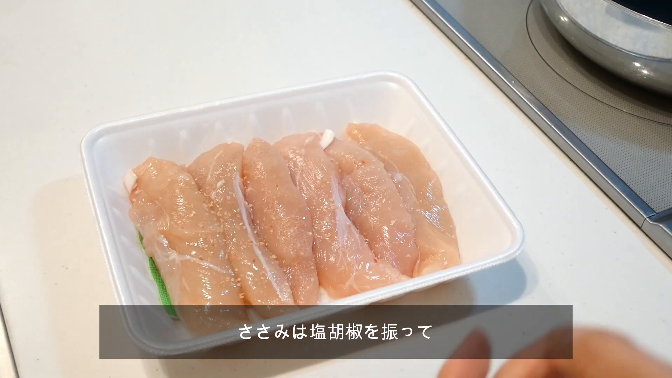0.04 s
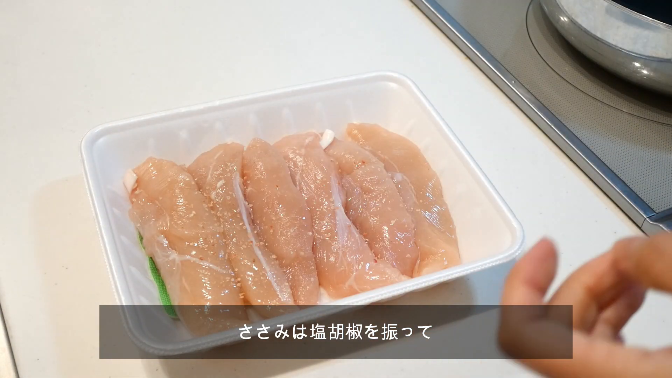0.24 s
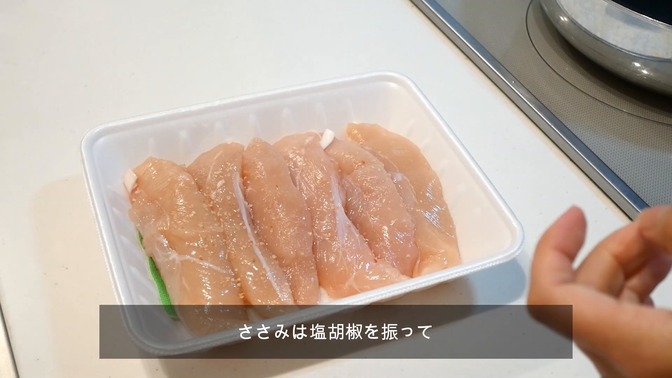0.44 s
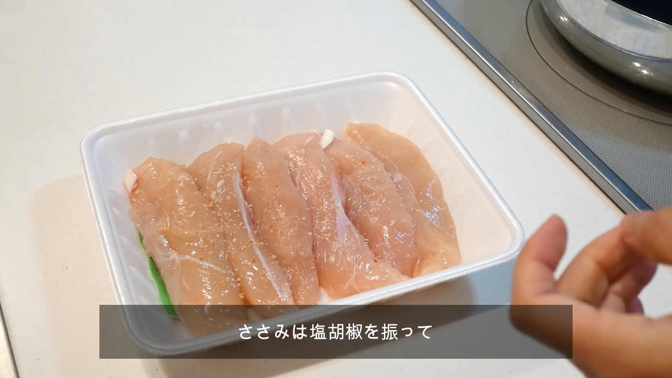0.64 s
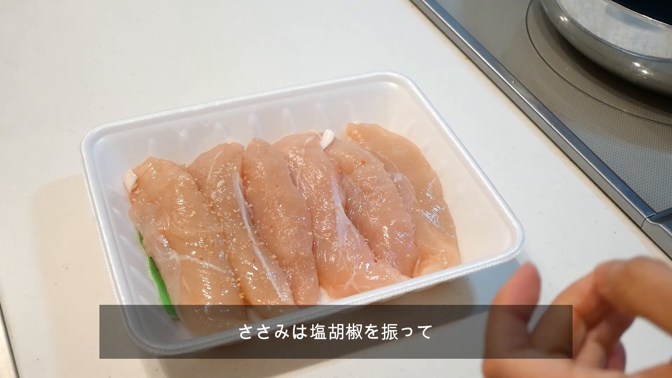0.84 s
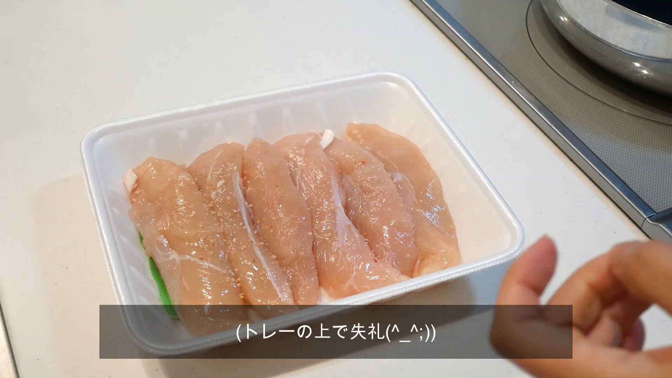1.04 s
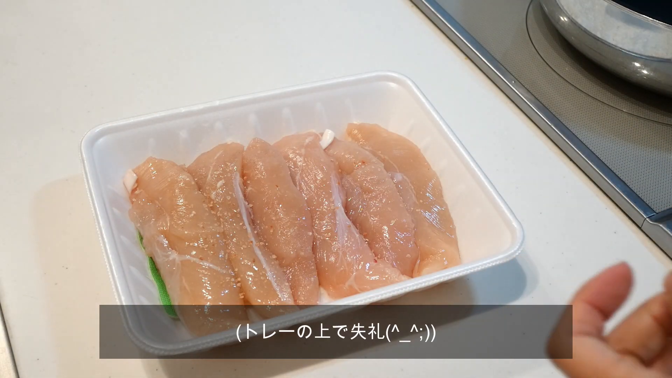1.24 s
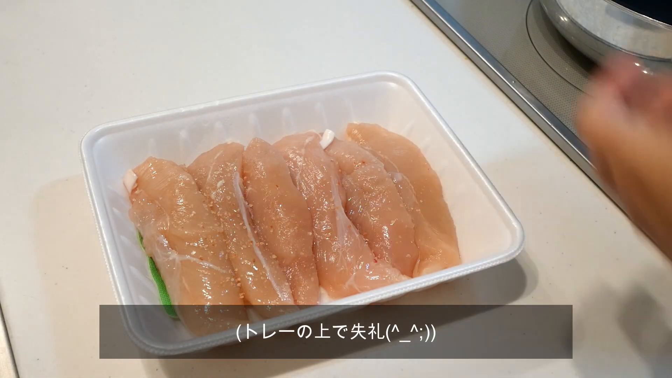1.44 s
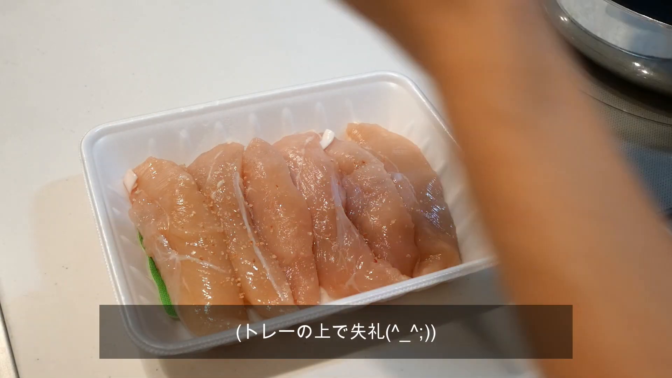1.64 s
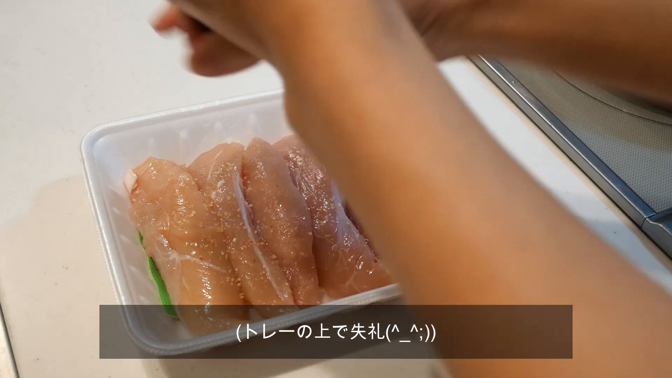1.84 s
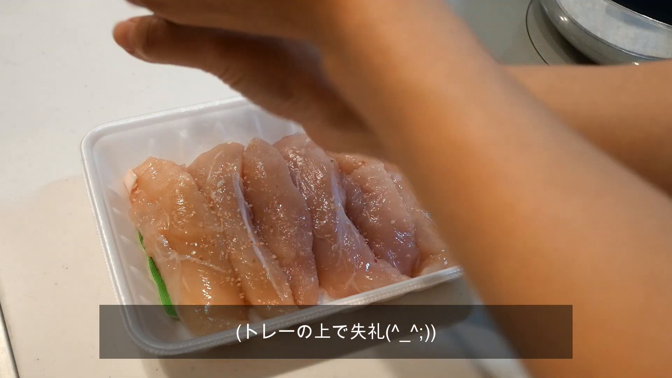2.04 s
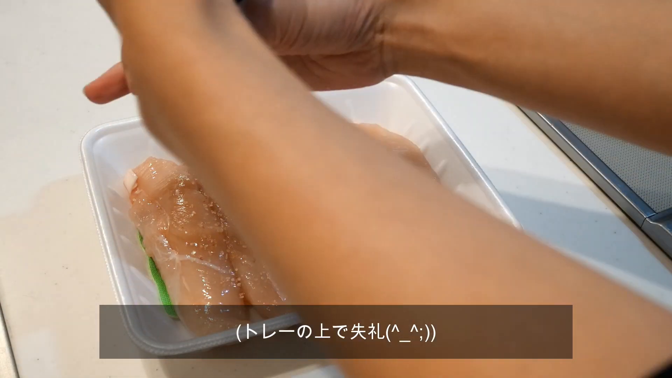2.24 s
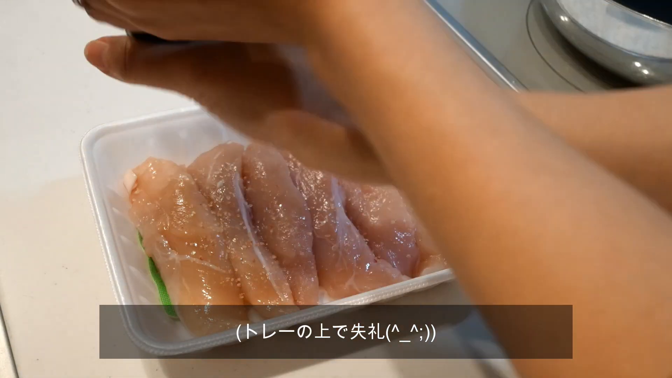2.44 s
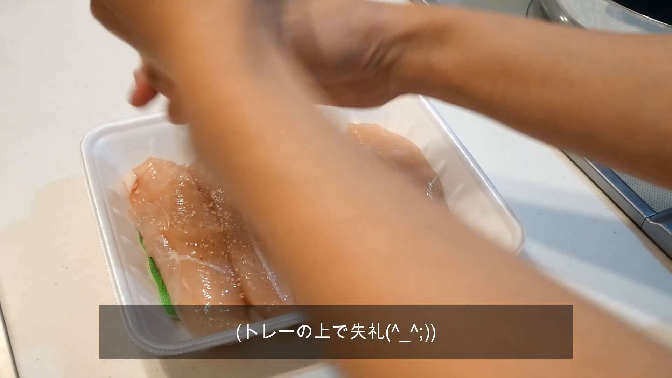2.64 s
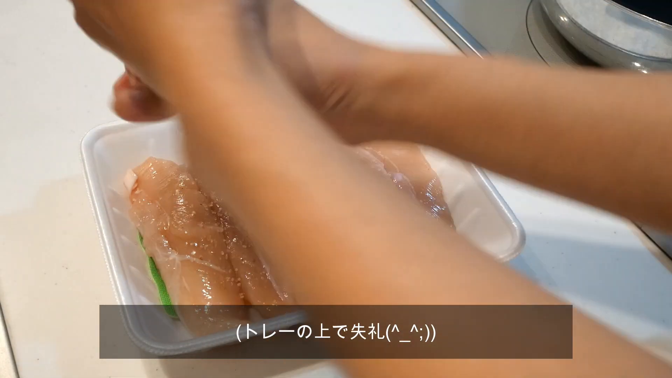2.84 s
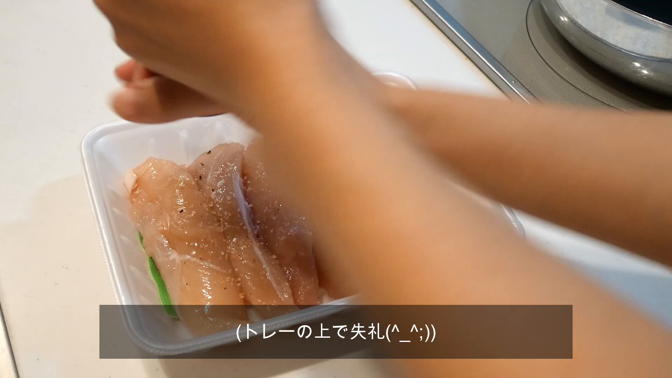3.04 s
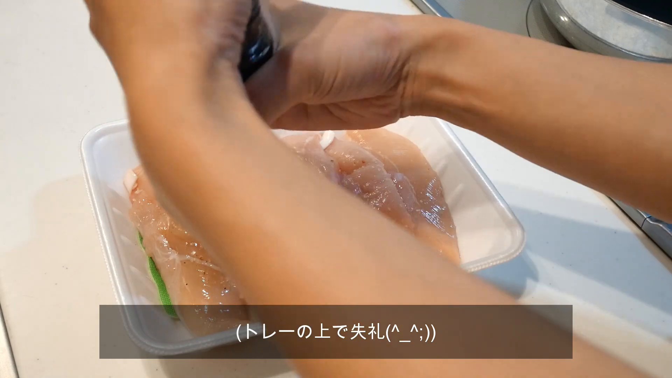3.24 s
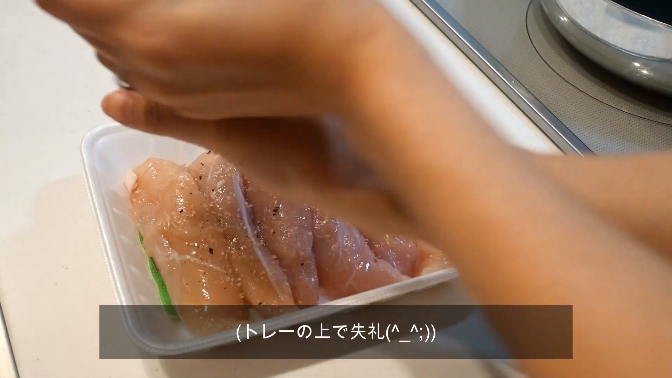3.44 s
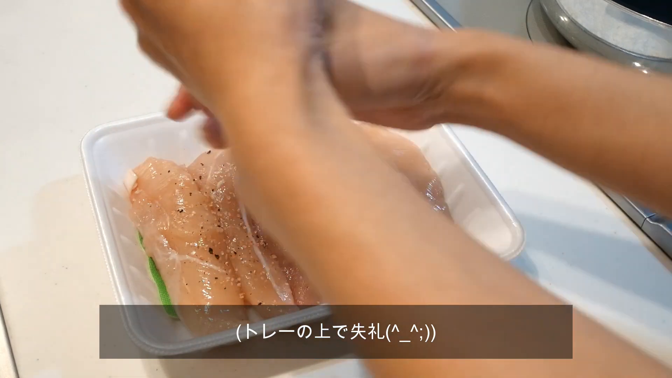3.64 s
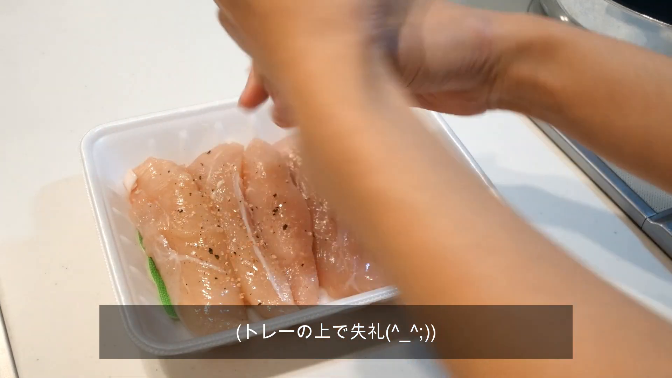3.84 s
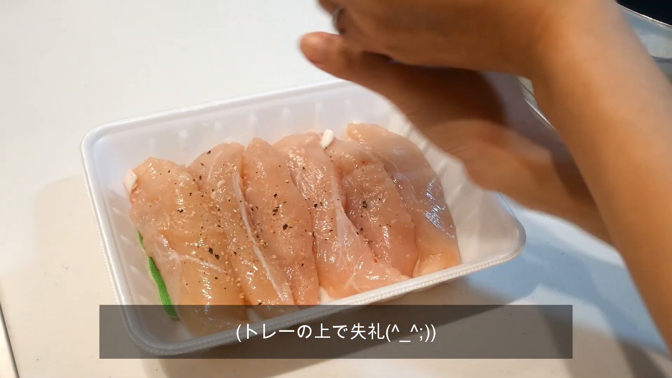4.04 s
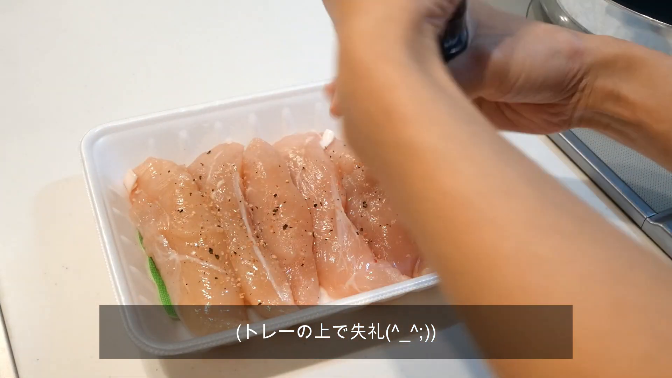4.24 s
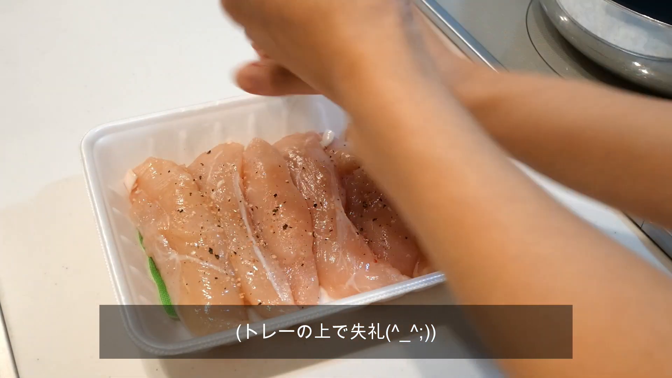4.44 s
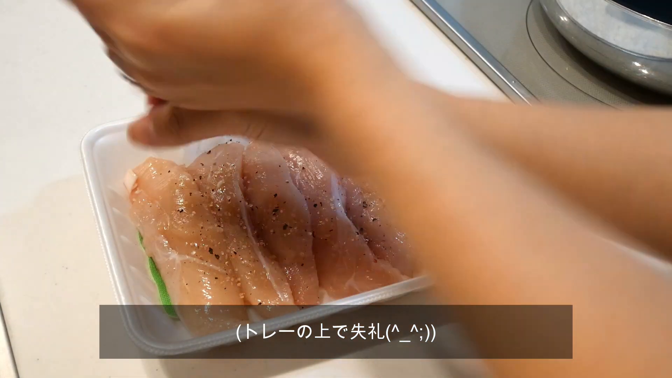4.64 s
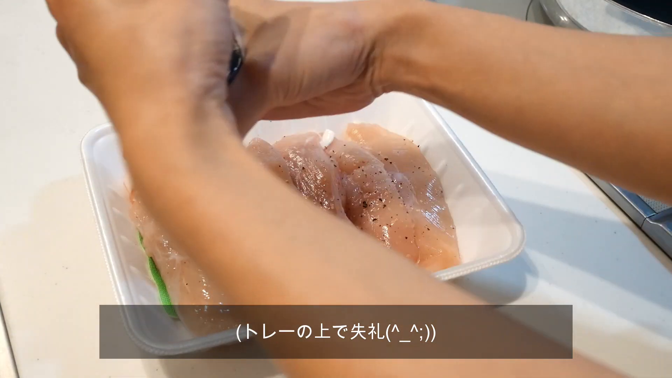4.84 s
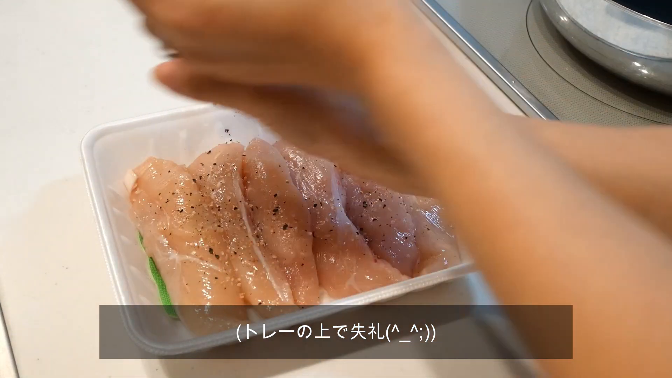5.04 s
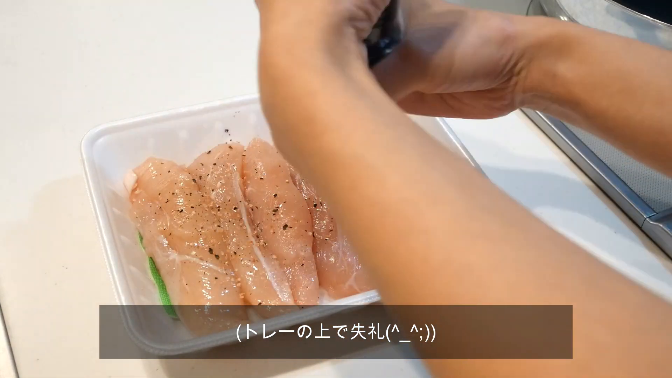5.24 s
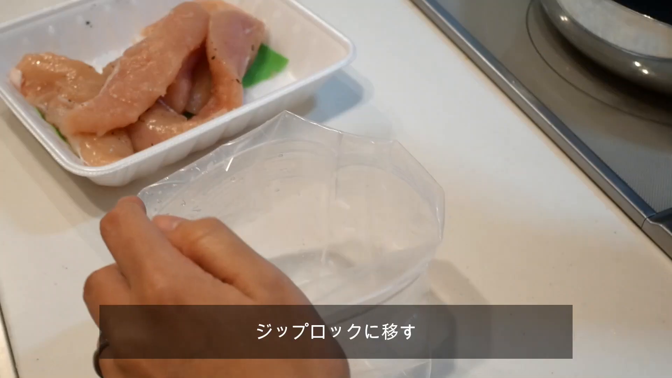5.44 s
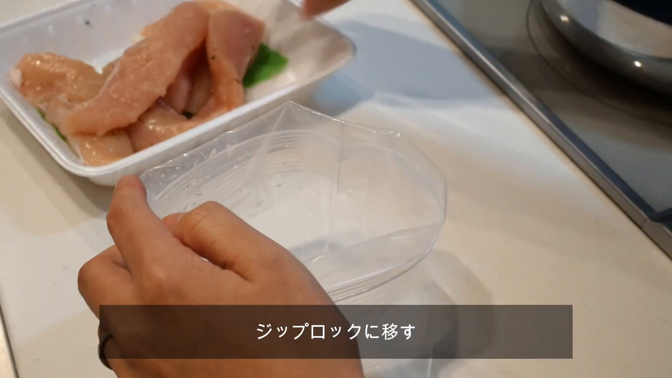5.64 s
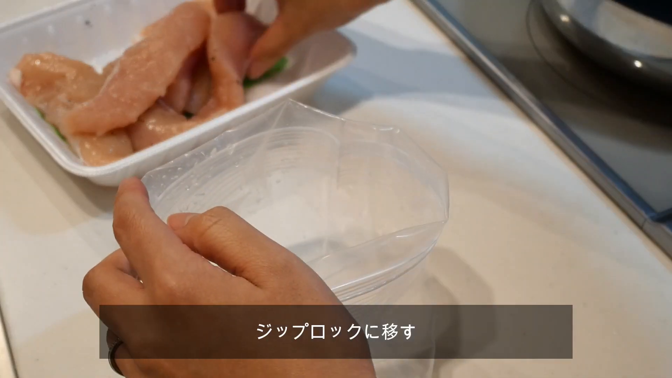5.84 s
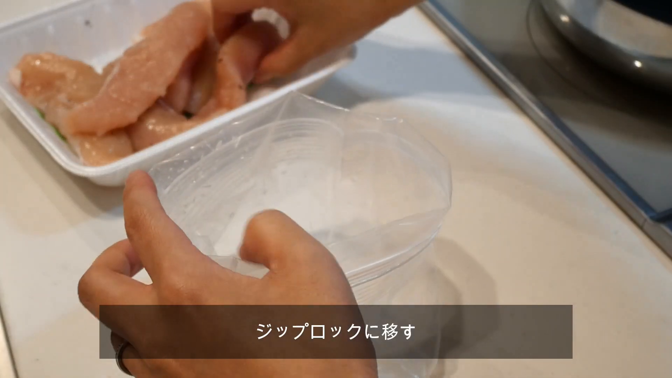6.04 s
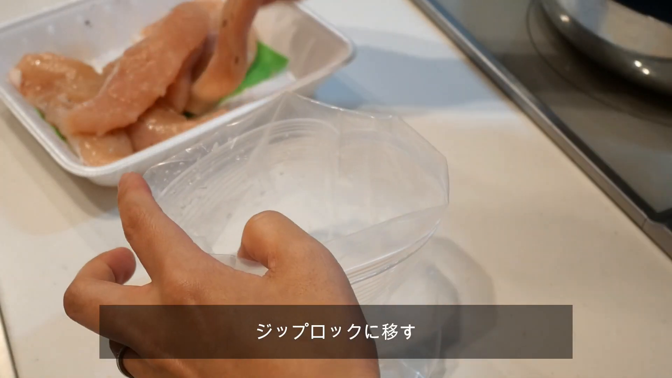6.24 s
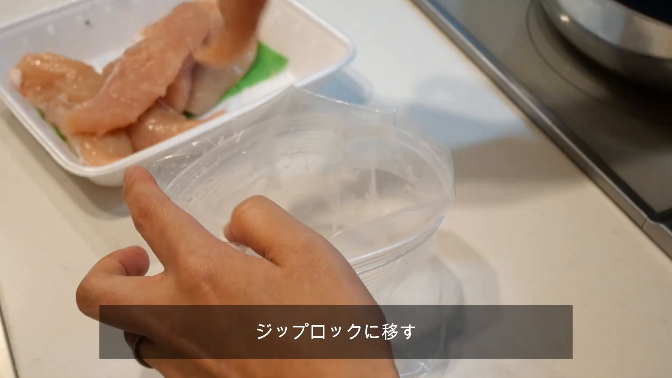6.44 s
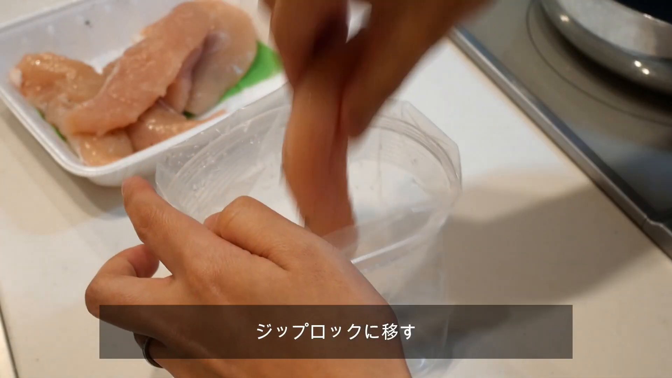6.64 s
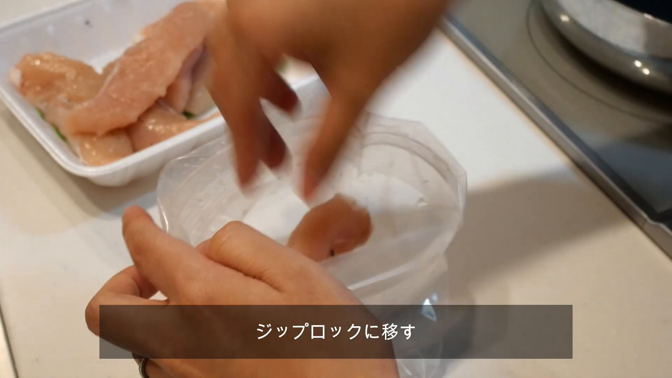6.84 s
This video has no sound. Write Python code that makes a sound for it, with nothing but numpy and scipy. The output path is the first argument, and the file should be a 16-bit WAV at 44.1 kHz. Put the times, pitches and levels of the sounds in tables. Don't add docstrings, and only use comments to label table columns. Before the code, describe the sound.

A jar knocks and slides on a kitchen counter, then peppercorns rattle and crunch in a hand mill before faint plastic bag crackles over fridge hum.

```python
import sys
import numpy as np
from scipy import signal
from scipy.io import wavfile
from scipy.ndimage import uniform_filter1d

SR = 44100
rng = np.random.default_rng(int(sys.argv[2]) if len(sys.argv) > 2 else 0)


def nominal_scale(level):
    x = np.asarray(level, float) / 20
    return 10 ** x


def master_out(mix):
    frames = np.transpose(np.atleast_2d(mix))
    ceiling = np.clip(frames, -1, 1)
    pcm = np.round(ceiling * 32767).astype(np.int16)
    wavfile.write(sys.argv[1], SR, pcm)


N = 304290

# time in seconds, peak in dB, snap in Hz, hollow body and bright spit in
# dB relative to the snap.
CRACKS = [(1.8235, -20, 4300, -10.5, -17), (2.2333, -20, 3990, -12, -19), (2.2474, -22, 2040, 0.5, -5.5),
          (2.6862, -25, 4430, -9.5, -19.5), (2.7005, -25.5, 3050, 7, -6), (2.7095, -24, 3220, -17.5, -12),
          (2.7307, -16.5, 2460, -0.5, -14), (2.748, -20, 3500, -8, -14), (2.7545, -22.5, 2500, -22, -17),
          (3.1383, -20.5, 3560, -19, -14), (3.1452, -17, 3410, -10, -7), (3.1586, -22, 3570, -31, -15),
          (3.1862, -22.5, 3270, -14, -10), (3.1928, -18.5, 4030, -9, -13), (3.2049, -26, 3660, -28, -12),
          (3.6523, -13, 6160, -2, -12.5), (3.6597, -6.5, 3340, -7.5, -6.5), (3.6744, -14, 4650, -13.5, -2),
          (3.7012, -17.5, 3335, -8.5, -7), (3.7077, -16.5, 3200, -13, -11.5),
          (3.7414, -14, 3240, -3.5, -9.5), (3.755, -12.5, 3410, -10, -7), (4.1825, -26, 3862, -22.5, -20),
          (4.21, -16, 4870, -7, -18), (4.2553, -6.5, 4667, -14.5, -10.5), (4.2732, -6, 3490, -10, -9),
          (4.2797, -14.5, 3190, -8.5, 1), (4.3168, -32.5, 3040, -17.5, 11),
          (4.7361, -17.5, 3800, -10.5, -1), (4.7611, -22.5, 6900, 2, -1), (4.768, -19, 4870, -9, -2),
          (4.7772, -27, 7230, -3, -2.5), (4.8033, -26.5, 4600, -26, -6), (4.8105, -23.5, 4500, -11.5, 4),
          (4.8156, -16.5, 3810, -26.5, 0), (5.2075, -27, 5010, -16, -14.5), (5.2249, -24.5, 4890, -15, -12),
          (5.2494, -13, 4250, -5, -5), (5.2758, -18.5, 9170, -13.5, -1), (5.2946, -20.5, 4330, -14, -10)]
SHARDS = [
    (2.739, -23.5, 3000, -3, -16),
    (3.1907, -17.5, 2550, -7.5, -20),
    (3.6836, -24, 2000, 9, -15),
    (5.257, -19.5, 3000, -2, -16),
    (5.2983, -24.5, 2800, -4, -14),
]
# time in seconds, peak in dB, snap in Hz, hollow body in dB relative to the snap.
CHIPS = [(1.9543, -40.5, 4390, -16), (2.115, -45, 5550, -23), (2.19, -44.5, 2160, -10),
         (2.1979, -29.5, 4950, -15), (2.2272, -39, 2220, -3), (2.3153, -37, 6030, -3),
         (2.4215, -49, 3020, 4), (2.4523, -33.5, 3330, -11), (2.5518, -45, 4570, -13),
         (2.644, -35.5, 4960, 1), (2.6574, -30, 4890, -7), (2.674, -31, 3550, -8),
         (2.9413, -45.5, 2070, -10), (2.995, -56, 2150, 5), (3.112, -44, 3850, -9),
         (3.1188, -30.5, 3550, -6), (3.1252, -32.5, 2000, 3), (3.44, -51, 4150, -13),
         (3.4664, -39, 2390, 1), (3.4943, -44, 5000, -17), (3.5327, -39.5, 5100, -16),
         (3.58, -35, 5900, -33), (3.6133, -31.5, 4650, -26), (3.6332, -29, 3300, -9),
         (3.9675, -37, 3550, -13), (3.996, -45.5, 2220, -1), (4.0177, -47, 4290, 1),
         (4.2014, -47.5, 3600, -26), (4.4177, -35, 7650, -11), (4.4555, -41.5, 7200, -15),
         (4.5166, -47.5, 1960, 9), (4.657, -41, 4900, -27), (4.6651, -41.5, 4010, -28),
         (4.6819, -31, 5470, -34), (4.6899, -34, 5700, -27), (4.7238, -30, 3730, -8),
         (4.8689, -29, 4220, -21), (4.947, -52.5, 4610, -28), (4.965, -52, 4460, -13),
         (4.9883, -38, 4230, -23), (5.1343, -44.5, 5620, -23), (5.1535, -55.5, 4110, -23),
         (5.1858, -41, 4130, -11), (5.219, -33, 2300, -0.5), (5.2448, -25, 3170, -4),
         (5.3471, -30.5, 6960, -16), (5.3872, -40, 4660, -15), (5.4203, -36, 5080, -21)]
# time in seconds, peak in dB, snap in Hz, bright spit
# in dB relative to the snap.
TAPS = [(1.5303, -45, 4500, -5), (1.585, -41, 5130, -20), (1.6345, -38, 5160, -15), (1.649, -51, 11000, -3),
        (1.6587, -37.5, 5470, -10), (1.7032, -40.5, 6870, -11), (1.7247, -31, 7300, -8),
        (1.776, -28, 5270, -4)]


def fractures():
    large = list(CRACKS) + list(SHARDS)
    chips = [(*row, -29) for row in CHIPS]
    taps = [(s, db, hz, -16, spit_db) for s, db, hz, spit_db in TAPS]
    return large, chips + taps


# start, rise and hold in seconds, grit in dB, hollow body in dB relative to grit.
CRUSH = [(1.76, 0.054, 0.05, -32, -7), (2.13, 0.13, 0.0115, -39, -0.5), (2.61, 0.098, 0.049, -34, -3.5),
         (3.108, 0.056, 0.041, -32.5, -2), (3.63, 0.031, 0.032, -32, 0.5), (3.72, 0.021, .012, -28, 1),
         (4.15, 0.063, .006, -34.5, -17.5), (4.235, 0.045, 0.043, -31, -1.5),
         (4.66, 0.072, 0.1, -35.5, -13), (5.17, 0.093, 0.038, -29.5, -2.5)]
RETURN = [(1.9, 0.017, 0.12, -50.5, 0), (2.125, 0.032, 0.048, -56.5, 8), (2.37, 0.054, 0.067, -46, -2),
          (2.87, 0.048, 0.086, -45, -3.5), (3.385, 0.045, 0.065, -43, -3.5), (3.5, 0.015, 0.11, -49, -22.5),
          (3.9, 0.038, 0.11, -45.5, -6.5), (4.38, 0.013, 0.2, -51, -3.5), (4.95, 0.071, 0.054, -44.5, -3.5)]
# resonance in Hz, width in Hz, level in dB.
GRIT = [(2320, 6300, -5.5), (2650, 560, 0.5), (3270, 750, 0), (3950, 680, 0.5), (4560, 1200, -1),
        (5600, 1000, -2), (6760, 1300, -9.5)]
# resonance in Hz, width in Hz, level in dB.
DUST = [(7300, 1600, 11), (9800, 1300, 3), (11700, 2500, 1.5), (13900, 2100, 1)]
# resonance in Hz, width in Hz, level in dB.
BODY = [
    (1658, 78, 3),
    (1530, 260, -3),
    (1800, 750, -3.5),
    (1050, 710, -13),
]
# resonance in Hz, width in Hz, level in dB.
GRIP = [(342, 89, 13), (520, 140, 7), (110, 120, -11.5)]
# time in seconds, left-right difference in dB.
MILL_PLACE = [(1.3, -8), (2.2, 2.6), (3.7, 3), (4.2, -2.5), (4.5, -3), (4.7, 3.5), (5.3, -4)]


def mill():
    crushing = twist(CRUSH, build_db=29, release_db_per_s=250.5, dust_db=-5.5, dust_steepness=0.86)
    rubbing = twist(RETURN, build_db=12.5, release_db_per_s=218, dust_db=-11.5, dust_steepness=2.5)
    grit, body, dust = crushing + rubbing
    large, small = fractures()
    crumble = debris(large + small, t60=0.097)

    ground = spread(lambda: grains(2000, spread_db=2.0, clump_db=4.0), 0.35)
    centre = ground.sum(axis=0)
    burrs = rms_one(band(resonate(ground, GRIT, dealt=True), 890, 8000))
    cavity = rms_one(wander(resonate(centre, BODY)))
    hands = rms_one(resonate(centre, GRIP))
    powder = rms_one(band(resonate(ground, DUST, dealt=True), 3700, 22000))

    sound = (grit + nominal_scale(-16.0) * crumble) * burrs
    sound += (nominal_scale(0.5) * body + nominal_scale(-28.5) * crumble) * cavity
    sound += (nominal_scale(-28) * crumble + nominal_scale(-17.5) * body) * hands
    sound += lean(0.8) * (dust + nominal_scale(-17) * crumble) * powder

    cracks = snaps(small, MILL_PLACE, ring_ms=0.57, width=0.2, crack_db=-18, hollow=BODY, hollow_db=-1.0,
                   jolt_db=-34.5, gain_db=2.0, top_hz=15540)
    cracks += snaps(large, MILL_PLACE, ring_ms=1.3, width=0.078, crack_db=-4.5, hollow=BODY, hollow_db=0.3,
                    jolt_db=-33.5, gain_db=-1.0, top_hz=15700)
    return nominal_scale(-2.5) * sound * lean(0.5) + cracks


def twist(rows, build_db, release_db_per_s, dust_db, dust_steepness):
    effort = [row[:4] for row in rows]
    hollow = [(*row[:3], row[3] + row[4]) for row in rows]
    grit = swell(effort, build_db, release_db_per_s)
    body = swell(hollow, build_db, release_db_per_s, steep=2)
    dust = nominal_scale(dust_db) * swell(effort, build_db, release_db_per_s, dust_steepness)
    return np.array([grit, body, dust])


# time in seconds, pitch ratio.
BODY_PITCH = [(1.8, 1.03), (2.4, 1.03), (2.52, .96), (2.7, 1.0), (3.1, .99), (3.65, 1.0), (3.85, .96),
              (4.0, .98), (4.4, 1.01), (4.75, .98), (5.4, 1.01)]
BODY_WANDER = 0.008


def wander(x):
    ratio = np.interp(np.arange(N) / SR, *np.transpose(BODY_PITCH)) + BODY_WANDER * drift(5.0)
    return np.interp(np.cumsum(ratio) % (N - 1), np.arange(N), x) * nominal_scale(1.5 * drift(31))


def snaps(rows, place, ring_ms, width, crack_db, hollow, hollow_db, jolt_db, gain_db, top_hz):
    out, t = np.zeros((2, N)), np.arange(1500) / SR
    envelope = (1 - np.exp(-t / 0.00011)) * np.exp(-t * 1000 / ring_ms)
    for s, db, hz, body_db, spit_db in rows:
        burst, other = rng.standard_normal((2, len(t))) * envelope
        ears = pair(burst, other, 0.44)
        ring = crest(resonate(ears, [(hz, width * hz, 0)]))
        crack = crest(band(band(ears, 2000, 5400), 1200, 8000))
        spit = crest(band(band(pair(burst, other, 0.1), 6600, top_hz), 3600, 13000))
        snap = crest(ring + nominal_scale(crack_db) * crack) + nominal_scale(spit_db - 0.5) * spit

        detune = np.interp(s, *np.transpose(BODY_PITCH)) + BODY_WANDER * rng.standard_normal()
        body = resonate(burst, [(centre * detune, wide, level) for centre, wide, level in hollow])
        snap += nominal_scale(body_db + hollow_db) * crest(body)
        snap += nominal_scale(jolt_db) * crest(resonate(np.abs(burst), GRIP))
        add(out, s - 0.0003, nominal_scale(db + gain_db) * snap, np.interp(s, *np.transpose(place)))
    return out


def debris(rows, t60):
    power = np.zeros(N)
    np.add.at(power, [round(row[0] * SR) for row in rows], nominal_scale([2 * row[1] for row in rows]))
    return np.sqrt(signal.lfilter([1], [1, -nominal_scale(-120 / (t60 * SR))], power))


# start, rise and hold in seconds, patter in dB, bright
# part in dB relative to the patter.
TUMBLE = [
    (1.233, .06, .03, -54.5, -17),
    (1.317, .008, 0.028, -42.5, -6),
    (1.342, 0.027, 0.033, -39, -6),
    (1.43, 0.059, 0.0078, -40.5, -6),
    (1.546, 0.1, .09, -48.5, -8),
    (1.71, 0.015, 0.0049, -36, -0.5),
    (1.76, 0.028, 0.095, -28.5, -4.5),
]
# resonance in Hz, width in Hz, level in dB.
SHELL = [(3160, 4700, -5.5), (5000, 1400, 0), (7460, 810, -3.5)]


def tumble():
    patter = swell([row[:4] for row in TUMBLE], build_db=12.5, release_db_per_s=220)
    bright = swell([(*row[:3], row[3] + row[4]) for row in TUMBLE], build_db=42, release_db_per_s=380)
    hits = spread(lambda: grains(6000, spread_db=-2.5, clump_db=3.5), 0.18)
    walls = rms_one(band(resonate(hits, SHELL, dealt=True), 2400, 12000))
    clicks = rms_one(band(hits, 8400, 13900))
    return nominal_scale(-3.5) * (patter * walls + bright * clicks) * lean(-0.5)


# time in seconds, peak in dB, tick in dB relative to the peak, pitch favoured by the
# spot struck in Hz.
KNOCKS = [(0.197, -13, -13, 623), (0.2035, -18, -29, 290), (0.2249, -31, -30, 255),
          (0.247, -25.5, -26, 280), (0.2863, -22, -10.5, 520), (0.2906, -22, -19, 306),
          (0.333, -33, -30, 288), (0.358, -34.5, -21, 270), (0.51, -43.5, -8, 280),
          (1.002, -32.5, -26, 580), (1.046, -38.5, -20, 850), (1.063, -44, -20, 300),
          (1.088, -33, -11.5, 320), (1.0978, -34, -30, 323), (1.113, -42, -12, 320), (1.138, -41, -13, 347)]
# pitch in Hz, level in dB, decay time t60 in seconds.
COUNTER = [(110, -8, 0.215), (141.5, 1, 0.72), (264.6, -6.5, 0.6), (310, 11.5, 0.057), (358, 1.5, 0.12),
           (482, -1, 0.18), (545.5, 6.5, 0.077), (710, -0.5, 0.095), (860, 0, 0.075), (974, -1, 0.13),
           (1256, -15, .05), (1290, -6, .05)]


def jar_knocks():
    out, t = np.zeros((2, N)), np.arange(9000) / SR
    for s, db, tick_db, spot_hz in KNOCKS:
        blow = np.zeros(len(t))
        for hz, level_db, t60 in COUNTER:
            mode_db = level_db - 17.5 * abs(np.log2(hz / spot_hz)) + rng.normal(0, 2.6)
            blow += nominal_scale(mode_db - 60 * t / t60) * np.sin(2 * np.pi * hz * t)
        blow += band(rng.standard_normal(len(t)), 110, 830) * nominal_scale(2.5 - 60 * t / 0.26)
        blow += band(rng.standard_normal(len(t)), 1017, 4700) * nominal_scale(tick_db + 11.0 - 60 * t / 0.1)
        blow += band(rng.standard_normal(len(t)), 5000, 15000) * nominal_scale(tick_db - 20.5 - 60 * t / 0.51)
        rise_s = 0.00072 * nominal_scale(-0.4 * (db + 13))
        add(out, s, nominal_scale(db - 10.5) * blow * (1 - np.exp(-t / rise_s)), pan_db=-1.2)
    return out


# start, rise and hold in seconds, level in dB.
SLIDE = [
    (0.33, 0.025, 0.064, -51.5),
    (.45, 0.045, 0.15, -51),
    (.74, 0.015, 0.023, -66),
]
# resonance in Hz, width in Hz, level in dB.
SCRAPE = [(1250, 52, 8.5), (2106, 270, 1.5), (2850, 88, 2), (3380, 230, 7), (4650, 190, -8),
          (6000, 280, -18)]
# start, rise and hold in seconds, level in dB.
SQUEAK = [(.35, 0.0098, 0.084, -49), (.45, .02, 0.018, -64), (.505, 0.06, 0.033, -50),
          (.62, 0.034, 0.0099, -60), (.72, 0.018, 0.05, -62.5)]
# start, rise and hold in seconds, level in dB.
BUMPS = [(.29, 0.0062, .005, -44), (.49, 0.05, .01, -52.5), (.6, 0.038, 0.083, -58)]
# start, rise and hold in seconds, level in dB.
SCUFF = [(0.99, 0.015, 0.012, -58.5), (1.07, .03, 0.031, -85)]
# start, rise and hold in seconds, level in dB.
THUDS = [(.995, .025, 0.027, -52), (1.085, 0.032, 0.072, -54)]


def jar_slide():
    rubbing = grains(4000, spread_db=2.0, clump_db=2.0)
    squeak_hz = 654 + 6.0 * drift(25)
    singing = np.sin(2 * np.pi * np.cumsum(squeak_hz) / SR) * nominal_scale(2.5 * drift(40))
    out = nominal_scale(2.5) * swell(SQUEAK, build_db=6, release_db_per_s=883) * singing

    scraping = rms_one(resonate(rubbing, SCRAPE) + nominal_scale(-6.5) * band(rubbing, 1400, 7200))
    out += nominal_scale(-7.0) * swell(SLIDE, build_db=2.5, release_db_per_s=190) * scraping
    shaking = nominal_scale(-23) * rms_one(band(rubbing, 30, 75)) + nominal_scale(0.5) * rms_one(band(rubbing, 68, 620))
    out += swell(BUMPS, build_db=1, release_db_per_s=139) * shaking
    out += nominal_scale(-9.5) * swell(THUDS, build_db=14, release_db_per_s=200) * rms_one(band(rubbing, 55, 130))
    out += nominal_scale(3.0) * swell(SCUFF, build_db=39, release_db_per_s=116) * rms_one(band(rubbing, 530, 4700))
    return out


# time in seconds, peak in dB, snap in Hz, low part and bright spit in dB relative
BAG = [(5.93, -66, 9020, -20, -2), (6.0756, -60, 4000, -7, -15), (6.1375, -49.5, 5300, -12, -20),
       (6.165, -65, 3550, -15, -15), (6.2247, -53.5, 6000, -9, -5), (6.2302, -63, 3010, -9.5, -15),
       (6.3202, -56, 3460, -13, -20), (6.7664, -64, 5030, -14.5, -15), (6.8217, -25.5, 3860, -13.5, -25),
       (6.8292, -33.5, 7900, -13, -23), (6.836, -33, 3500, -21, -8), (6.856, -39, 3200, -10, -17),
       (6.8603, -21.5, 2960, -17, -26), (6.862, -26, 5630, -19, -26), (6.8678, -44, 5000, -4, -12),
       (6.8985, -42, 4000, -8, -15)]
# start, rise and hold in seconds, level in dB.
RUSTLE = [
    (5.63, 0.014, 0.033, -69),
    (6.1, 0.042, 0.0039, -78),
    (6.3, .016, .004, -72),
    (6.72, 0.015, 0.1, -67),
]


def bag():
    film = rms_one(band(spread(lambda: grains(6000, spread_db=9.0, clump_db=1.5), 0.4), 1149, 7500))
    level = nominal_scale(-6.0) * swell(RUSTLE, build_db=15, release_db_per_s=72.5) + nominal_scale(-21) * debris(BAG, t60=0.2)
    flips = snaps(BAG, [(6, -0.4)], ring_ms=1.5, width=0.13, crack_db=4.5, hollow=[(1140, 290, 0)],
                  hollow_db=3.0, jolt_db=-22, gain_db=-0.1, top_hz=14000)
    return signal.sosfilt(signal.butter(4, 12500, fs=SR, output="sos"), level * film + flips)


# lower and upper edge in Hz, decay time t60 in seconds, level in dB, left-right likeness
WALLS = [
    (60, 500, .25, -11, .95),
    (500, 1200, .25, -12, .75),
    (1200, 2500, .28, -3, .5),
    (2500, 6000, .26, -2, .1),
    (6000, 16000, .22, -3, .02),
]


def kitchen(x):
    t, white = np.arange(SR // 2) / SR, rng.standard_normal((2, SR // 2))
    tail = 0
    for low, high, t60, db, alike in WALLS:
        tail = tail + nominal_scale(db - 28.0 - 60 * t / t60) * pair(*band(white, low, high), alike)
    build_up = 1 - np.exp(-(t / 0.00023) ** 2)
    return signal.fftconvolve(x.mean(axis=0, keepdims=True), tail * build_up, axes=1)[:, :N]


# frequency in Hz, density in dB per Hz.
AIR = [(18, -47.5), (32, -10), (98, -13), (311, -7.5), (480, -8.5), (2100, -26.5), (5000, -27.5),
       (10000, -33.5)]
# frequency in Hz, left-right likeness up to 1, values below 0 counting as
LIKENESS = [(60, 0.72), (180, 0.79), (550, 0.69), (1650, 0.69), (4970, -0.8), (15000, -0.02)]
# resonance in Hz, width in Hz, level in dB.
HUM = [(104, 34, -84), (187, 8.4, -73.5), (316, 27, -71), (476, 9.5, -75.5), (538, 14, -74.5)]
CUT_S = (5.4305, 5.6335)


def room_tone():
    air, edges, white = 0, 24 * 2 ** np.arange(0, 9.6, 0.5), rng.standard_normal((2, 2, N))
    for k, (low, high) in enumerate(zip(edges, edges[1:])):
        hz = np.sqrt(low * high)
        air = air + nominal_scale(at_hz(AIR, hz)) * pair(*band(white[k % 2], low, high), at_hz(LIKENESS, hz))
    hum = 0
    for hz, width, db in HUM:
        hum = hum + nominal_scale(db) * rms_one(resonate(rng.standard_normal(N), [(hz, width, 0)]))
    motor_hz = 104.5 + 3.1 * drift(3.5)
    hum += nominal_scale(-67) * np.sin(2 * np.pi * np.cumsum(motor_hz) / SR)
    traffic = nominal_scale(-74.5) * rms_one(band(white[0, 0], 26, 51)) * (np.arange(N) / SR > CUT_S[1])
    return nominal_scale(-61) * rms_one(air) + hum * lean(-0.5) + traffic


def swell(rows, build_db, release_db_per_s, steep=1):
    power, at = 1e-20, np.arange(0, N + 50, 50)
    for s, rise, hold, db in rows:
        knots = np.cumsum([s, abs(rise), abs(hold), 1])
        below = np.interp(at / SR, knots, [build_db, 0, 0, release_db_per_s], left=150, right=150)
        power = power + nominal_scale(2 * (db - steep * below))
    return np.interp(np.arange(N), at, np.sqrt(power))


def grains(per_s, spread_db, clump_db):
    born = rng.random(N) < per_s * nominal_scale(clump_db * drift(60)) / SR
    size = nominal_scale(spread_db * np.minimum(rng.exponential(1, N), 4))
    return rms_one(born * size * rng.choice([-1, 1], N))


def resonate(x, peaks, dealt=False):
    out, turn = 0, rng.integers(0, len(peaks), np.shape(x)[-1])
    for k, (hz, width, db) in enumerate(peaks):
        r = np.exp(-np.pi * width / SR)
        poles = [1, -2 * r * np.cos(2 * np.pi * hz / SR), r * r]
        zeros = np.array([1, 0, -1]) * (1 - r * r) / 2
        mine = x * (turn == k) if dealt else x
        out = out + (-1) ** k * nominal_scale(db) * signal.lfilter(zeros, poles, mine + 1e-18)
    return out


def drift(rate):
    r = np.exp(-2 * np.pi * rate / SR)
    return rms_one(signal.lfilter([1], [1, -2 * r, r * r], rng.standard_normal(N + 9000))[9000:])


def band(x, low_hz, high_hz):
    return signal.sosfilt(signal.butter(2, [low_hz, min(high_hz, SR / 2.1)], "band", fs=SR, output="sos"), x)


def rms_one(x):
    return x / np.sqrt(np.mean(x ** 2) + 1e-20)


def crest(x):
    return x / np.sqrt(2 * uniform_filter1d(x ** 2, size=40).max(axis=-1, keepdims=True))


def at_hz(points, hz):
    known_hz, value = np.transpose(points)
    return np.interp(np.log(hz), np.log(np.maximum(known_hz, 1)), value)


def pair(mid, side, alike):
    alike = np.clip(alike, 0, 1)
    return np.sqrt((1 + alike) / 2) * mid + np.sqrt((1 - alike) / 2) * side * [[1], [-1]]


def spread(make, alike):
    return pair(make(), make(), alike)


def lean(db):
    return nominal_scale([[db], [-db]])


def add(out, s, sound, pan_db):
    i = round(s * SR)
    out[:, i:i + sound.shape[-1]] += lean(pan_db / 2) * sound[..., :N - i]


def scene():
    near = mill() + tumble() + jar_knocks() + jar_slide() + bag()
    return near + kitchen(near) + room_tone()


def low_pass(x):
    return signal.sosfilt(signal.butter(12, 16630, fs=SR, output="sos"), x)


def record(dry):
    t = np.arange(N) / SR
    rounded = 0.84 * np.tanh(dry / 0.94)
    dull = signal.sosfilt(signal.cheby2(10, 45, 16650, fs=SR, output="sos"), rounded)
    heard = (t < CUT_S[0]) | (t > CUT_S[1])
    return low_pass(dull * heard)


dry = scene()
out = record(dry)
master_out(out)
```